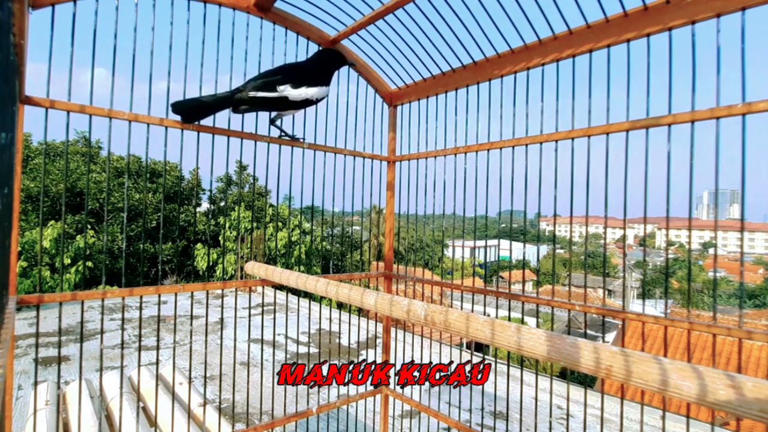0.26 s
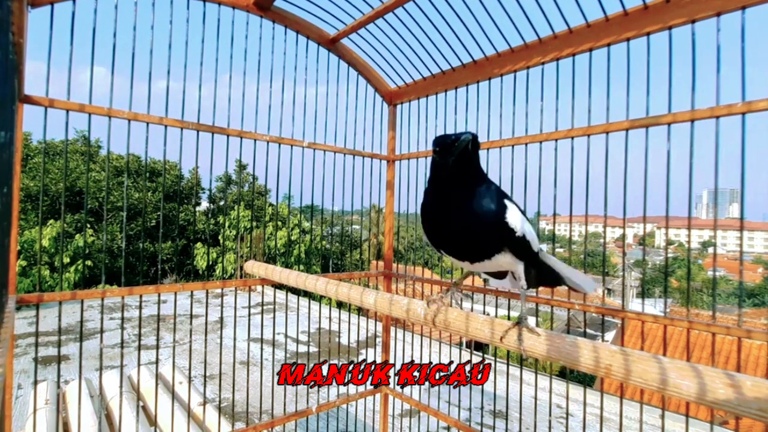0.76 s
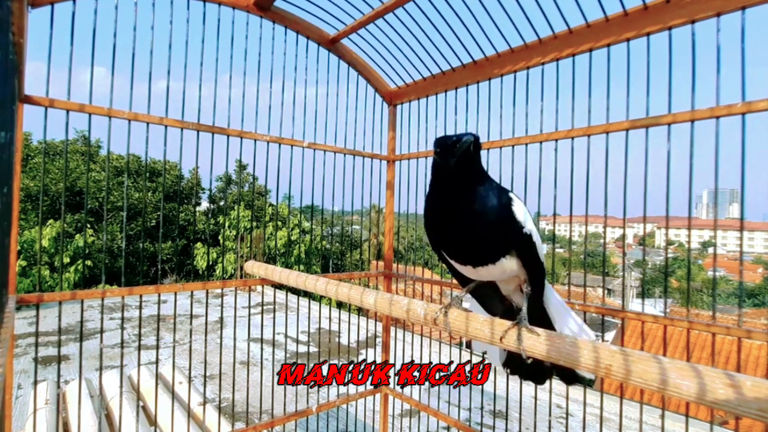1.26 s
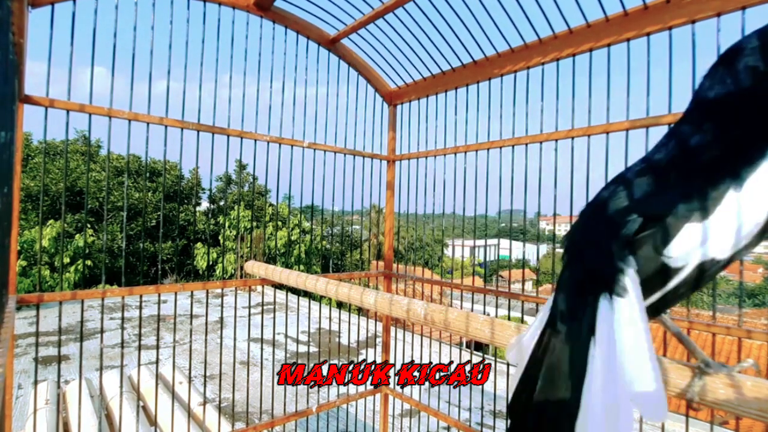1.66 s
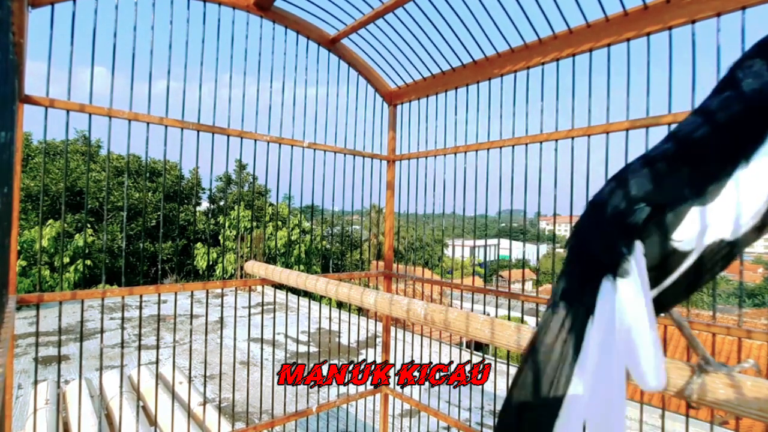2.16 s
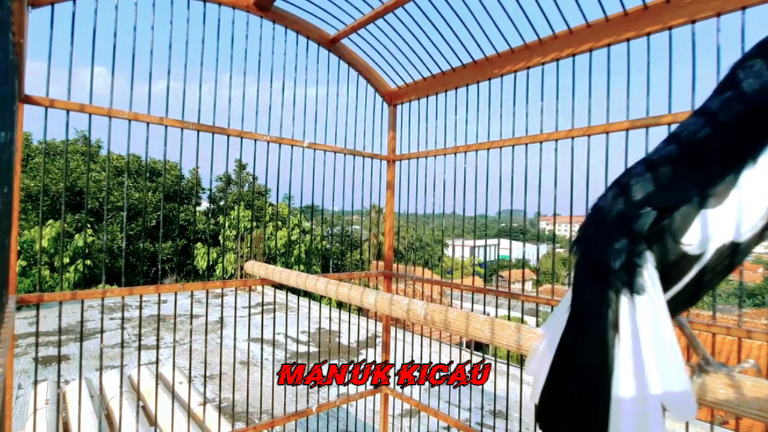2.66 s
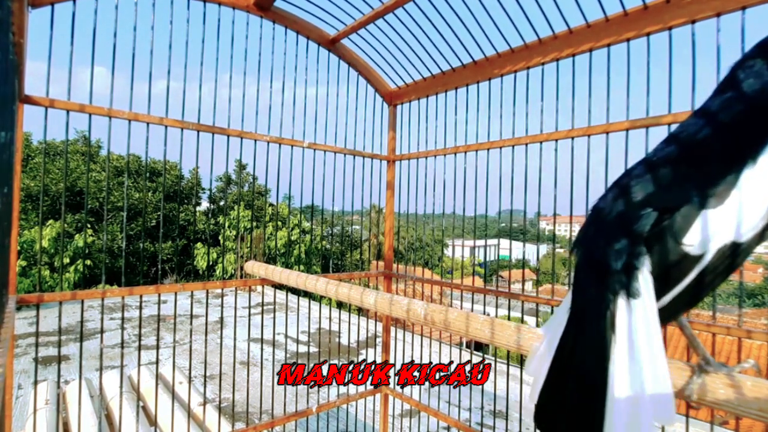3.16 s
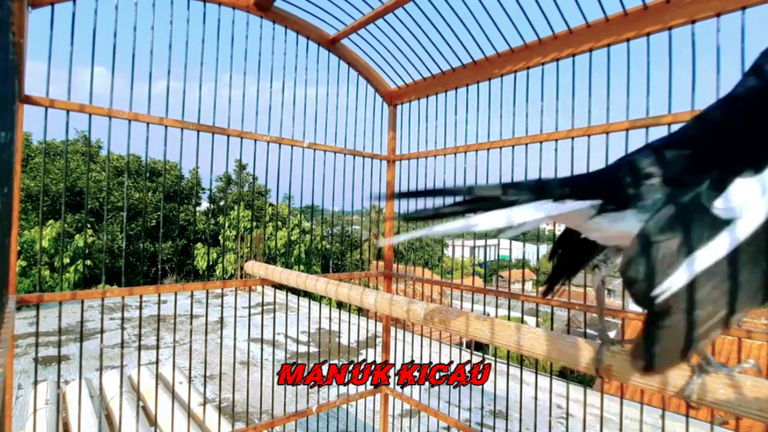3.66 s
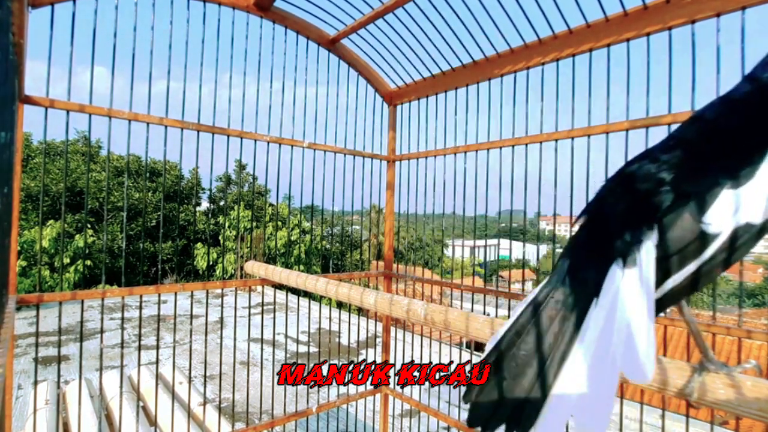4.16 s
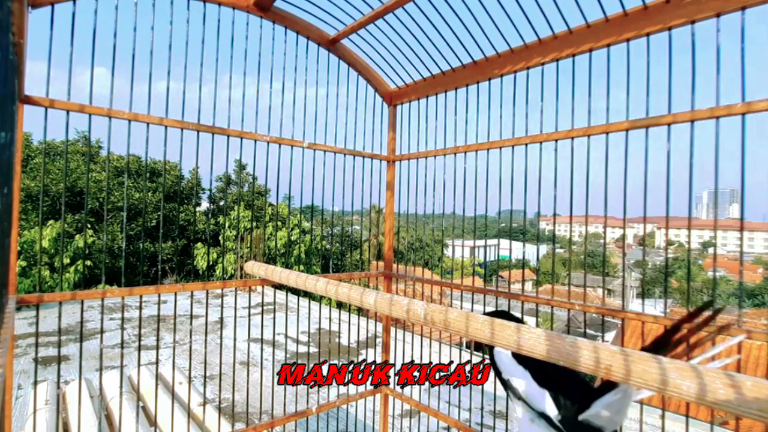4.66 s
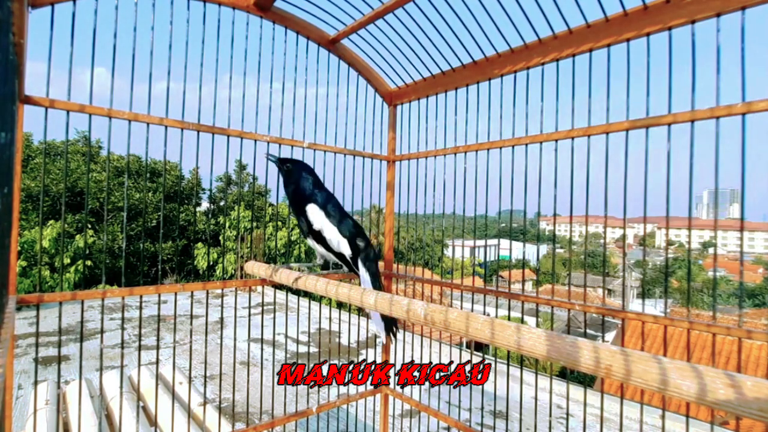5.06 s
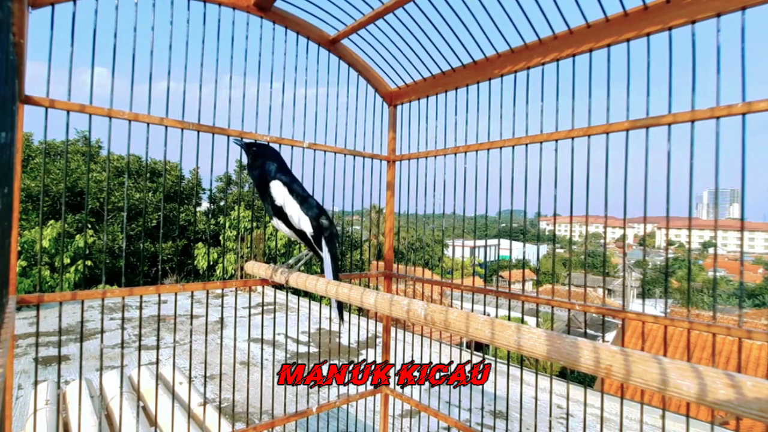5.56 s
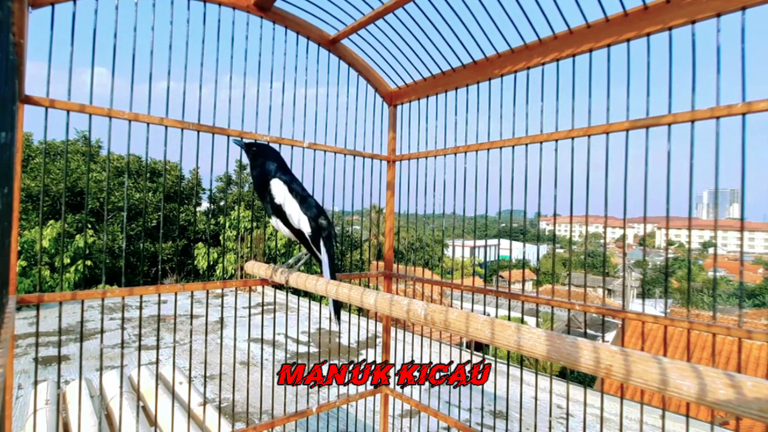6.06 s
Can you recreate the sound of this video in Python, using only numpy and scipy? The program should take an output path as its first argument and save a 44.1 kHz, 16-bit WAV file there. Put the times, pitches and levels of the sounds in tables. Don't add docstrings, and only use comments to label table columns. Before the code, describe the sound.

A songbird in a wooden cage sings very near the microphone, loud enough to distort. After two hard ticks and a jangling wire, it calls harshly while the wires buzz and settle. Separate churrs, chews and thin high notes alternate with short gaps; feet thud dully on wood. Another, more echoing bird glides and squeaks in reply. Wind buffets low, mostly on the right around three seconds, and distant town air hums throughout outdoors.

```python
import sys
import numpy as np
from scipy import signal
from scipy.io import wavfile
from scipy.ndimage import uniform_filter1d

SR = 44100
rng = np.random.default_rng(int(sys.argv[2]) if len(sys.argv) > 2 else 0)


def transcribe(u):
    v = np.clip(np.atleast_2d(u).T, -1, 1)
    q = np.round(v * 32767).astype(np.int16)
    wavfile.write(sys.argv[1], SR, q)


def boost(x):
    u = np.asarray(x, float) / 20
    return 10 ** u


N = 278271
LEAD_S = .002


def read(points, hz):
    f, value = np.transpose(points)
    return np.interp(np.log(hz + 1), np.log(f + 1), value)


def evened(x):
    return x / np.sqrt(np.mean(x ** 2, -1, keepdims=True) + 1e-20)


def add(mix, start_s, sound, pan_db):
    part = mix[:, round(start_s * SR):][:, :sound.shape[-1]]
    ports = sound * boost(np.array([[pan_db], [-pan_db]]) / 2)
    part += ports[:, :part.shape[1]] / np.sqrt(np.cosh(pan_db * np.log(10) / 20))


def wobble(shape, hz):
    low_pass = signal.butter(4, hz, fs=SR, output="sos")
    return evened(signal.sosfilt(low_pass, rng.standard_normal(shape)))


def noise(spectrum, patchy_db):
    hz = np.fft.rfftfreq(2048, 1 / SR)
    a, b, patches = rng.standard_normal((N // 512 + 5, 1025, 2, 3)).T
    patches = uniform_filter1d(patches, size=12, axis=1)
    patches = evened(uniform_filter1d(patches, size=5, axis=2))
    z = (a + 1j * b) * boost(read(spectrum, hz)[:, None] + patchy_db * patches)
    return evened(signal.istft(z, nperseg=2048, noverlap=1536)[1][:, :N])


def held(table, s):
    return [row for row in table if row[0] <= s][-1][1:]


def sung(voices, rows):
    if rows is None:
        return [np.array(voice) for voice in voices]
    return [np.array(voice) * [1, ratio, 1] + [beat, 0, db]
            for beat, ratio, *strengths in rows for voice, db in zip(voices, strengths)]


def town_hum():
    # pitch_hz, level_db (per Hz)
    hum = [(150, -11), (330, -5), (500, -20.5), (1000, -28), (3000, -34.5), (6000, -41.5), (8300, -50),
           (9500, -75.5)]
    return boost(-47.5) * noise(hum, 0.67)


def wind():
    # time_s, left_db, right_db
    gusts = [(0, -37.5, -45), (1.8, -43.5, -40), (1.95, -41.5, -30), (2.2, -46, -38.5), (2.5, -57, -23.5),
             (2.8, -45, -29), (2.951, -40, -18), (3.45, -53, -24), (3.52, -45, -35.5), (4.1, -45, -38.5),
             (5.4, -40, -40.5), (6.31, -39.5, -35.5)]
    # pitch_hz, level_db
    rumble = [(25, -38.5), (60, -12), (100, 6), (140, -8.5), (250, -22.5), (500, -69), (3000, -110)]
    s, *ports_db = np.transpose(gusts)
    t = np.arange(N) / SR
    level_db = np.array([np.interp(t, s, port) for port in ports_db])
    return noise(rumble, 1.8) * boost(level_db + 1.8 * wobble((2, N), 40))


def balcony(x, early_db, tail_db, tail_t60):
    t = np.arange(SR // 2) / SR
    signs = rng.choice([-1., 1.], (2, len(t)))
    taps = signs * (rng.random((2, len(t))) < .05) * (t > .002)
    early = taps * boost(-60 * t / .05)
    tail = taps * boost(-60 * t / tail_t60)
    echo = boost(early_db) * early / np.linalg.norm(early[0])
    echo = echo + boost(tail_db) * tail / np.linalg.norm(tail[0])
    return signal.fftconvolve(x, echo, axes=1)[:, :N]


def wood_knocks():
    # start_s, peak_db, pitch_hz, t60_s,
    # left_minus_right_db
    knocks = [(0.179, -32, 1340, 0.085, 33), (.183, -35, 449, 0.17, 27), (0.673, -23, 1218, .11, 32),
              (0.673, -21.5, 345.3, 0.18, 40), (0.676, -28, 582, 0.093, 31), (.833, -19, 98.8, 0.21, 32.5),
              (.835, -25.5, 550, 0.2, 36), (0.839, -40, 1190, 0.094, 19), (1.549, -38, 332.2, 0.39, 9),
              (2.253, -8, 107.2, 0.084, -33), (4.399, -38.5, 313, 0.39, 19), (4.703, -32.5, 321, 0.23, 24),
              (4.825, -21.5, 534.7, 0.15, 28), (4.829, -21.5, 123.4, .12, 19.5),
              (4.985, -38, 518.7, 0.16, 29)]
    out, t = np.zeros((2, N)), np.arange(SR // 2) / SR
    for s, db, hz, t60, pan_db in knocks:
        wide = 1.127 + 50 / hz
        band = signal.butter(2, [hz / wide, hz * wide], "bandpass", fs=SR, output="sos")
        thud = evened(signal.sosfilt(band, rng.standard_normal(len(t))))
        thud = thud + 0.31 * wobble(len(t), 1800)
        thud += 1.8 * np.sin(2 * np.pi * hz * t)
        attack = 1 - np.exp(-t / 0.0083)
        add(out, s, boost(db + 2.5 - 60 * t / t60) * thud * attack, pan_db)
    return out


def ringing_wire():
    # pitch_hz, level_db, t60_s
    modes = [
        (2350, -36, 0.23),
        (3550, -45, 0.55),
        (7070, -58, .5),
    ]
    out, t = np.zeros((2, N)), np.arange(SR // 2) / SR
    for hz, db, t60 in modes:
        ring = boost(db - 60 * t / t60) * np.sin(2 * np.pi * hz * t)
        rattle = 1 + 1.15 * wobble(len(t), 68)
        attack = 1 - np.exp(-t * 2400000.0 / hz)
        add(out, .168, ring * rattle * attack, 6)
    return out


def clicks():
    # start_s, peak_db
    ticks = [
        (0.1254, -5),
        (0.132, -2),
        (0.1646, -50),
        (1.945, -53),
        (1.955, -56),
        (3.441, -59.5),
        (4.838, -45.5),
    ]
    out = np.zeros((2, N))
    for s, db in ticks:
        add(out, s, boost(db) * np.array([1., -1, .3]), 8)
    return out


def wire_buzz():
    # pitch_hz, width_hz, level_db
    resonances = [
        (3550, 330, -2),
        (4150, 350, -7),
        (5500, 520, -5),
        (4900, 2600, -12),
        (6600, 670, -14),
        (9490, 5100, -25),
        (12200, 5700, -16.5),
    ]
    hz = np.geomspace(1500, 16000, num=400)
    power = sum(boost(db) ** 2 / (1 + (2 * (hz - f) / width) ** 2) for f, width, db in resonances)
    wires_db = 10 * np.log10(power) - 24 * (hz < 3000) * np.log2(3000 / hz)

    landing_s, rise_s, hold_s, still_s = .56, 0.12, .2, .94
    t = np.arange(N) / SR - landing_s
    rise_db = -40 * np.maximum(1 - t / rise_s, 0)
    sag_db = 24 * np.maximum(t - rise_s - hold_s, 0)
    stop_db = 69 * np.maximum(t - still_s, 0)
    shake_db = np.maximum(-24.5 + rise_db - sag_db - stop_db, -200)
    shake = boost(shake_db + 1.2 * wobble(N, 110))

    buzz = noise(np.c_[hz, wires_db], 2.5)
    dull = signal.sosfiltfilt(signal.butter(3, 7000, fs=SR, output="sos"), buzz)
    buzz = dull + (buzz - dull) * boost(-24 * np.maximum(t, 0))
    return buzz * shake * boost(np.array([[3.], [-3.5]]))


def cage():
    return wood_knocks() + ringing_wire() + clicks() + wire_buzz()


def whistle(rows, lag_ms, rough, second_db, beak_db=26, third_db=-70):
    # multiple, level_db
    overtones = [(3, -62), (4, -60), (5, -62), (6, -54)]
    s, hz, level_db = np.transpose(rows)
    t = np.arange(s[0] - LEAD_S, s[-1] + LEAD_S, 1 / SR)
    pitch = uniform_filter1d(np.interp(t, s, hz), size=60)
    pitch = pitch + 1200 * rough ** 2 * wobble(len(t), 200)
    turns = np.cumsum(pitch) / SR
    turns = np.array([np.interp(t - lag_ms / 1000, t, turns), turns])

    tone = np.sin(2 * np.pi * turns)
    tone += boost(second_db) * np.sin(4 * np.pi * turns)
    tone += boost(third_db) * np.sin(3 * 2 * np.pi * turns)
    for multiple, db in overtones:
        beak = beak_db * np.exp(-((multiple * pitch - 14500) / 2300) ** 2)
        strength = boost(db - 50 * rough + beak) * (multiple * pitch < 16e3)
        tone += strength * np.sin(2 * np.pi * round(multiple) * turns)
    tone += boost(-15.5) * rough * wobble((2, len(t)), 9500)

    flutter = 1 + rough * wobble(len(t), 450)
    swell = np.interp(t, s, boost(level_db / 2)) ** 2
    fade = signal.windows.tukey(len(t), min(.008 * SR / len(t), 1))
    return tone * flutter * swell * fade


def neighbour_whistles():
    # time_s (from the beat), pitch_hz, level_db
    glide = [
        [(-.09, 2174, -46), (-.034, 2646, -16), (0, 3038, -26.5)],
        [(0, 3250, -24), (.04, 3550, -16), (.075, 3618, -20)],
        [(.095, 2980, -27.5), (.15, 2267, -29.5), (.21, 2350, -26), (.255, 2546, -39)],
    ]
    # beat_s, pitch_ratio, strength_db of each part
    glide_beats = [
        (3.87, .99, -.1, 4.5, -1.5),
        (4.475, 1.01, 0.12, -1.5, -6),
    ]
    # time_s, pitch_hz, level_db
    strays = [
        [(2.05, 2510, -56), (2.175, 4530, -47.5)],
        [(3.36, 4406, -55.5), (3.466, 4080, -26), (3.508, 4004, -44), (3.6, 3940, -50.5)],
        [(3.69, 4637, -53), (3.72, 4590, -54), (3.86, 4425, -62.5)],
        [(3.5, 3054, -67), (3.56, 3180, -45.5), (3.66, 3246, -54.5)],
        [(3.64, 3500, -56.5), (3.68, 3656, -52.5), (3.76, 3734, -62)],
    ]
    out = np.zeros((2, N))
    for rows in sung(glide, glide_beats) + strays:
        s, hz = rows[0][0], rows[0][1]
        rough = .05 if s > 3 else .5
        third_db = -38 if hz > 4e3 else -70
        add(out, s - LEAD_S, whistle(rows, -.26, rough, -41.0, 0, third_db), 9)
    return out


def neighbour_squeaks():
    # start_s, end_s, pulse_rate_hz, strongest_multiple, level_db
    squeaks = [
        (2.862, 3.022, 654, 4, -45.5),
        (3.471, 3.592, 598.5, 5, -38),
    ]
    out = np.zeros((2, N))
    for start, end, hz, top, db in squeaks:
        top = round(top)
        t = np.arange(0, end - start, 1 / SR)
        bend = 1 - 0.0412 * np.exp(-t / 0.021) - 0.016 * (t / t[-1]) ** 8
        turns = np.cumsum(hz * bend * (1 + 0.005 * wobble(len(t), 60))) / SR
        upper = np.zeros(len(t))
        for k in range(1, 16):
            level_db = -17.0 + 9.0 * (k % top == 0) - 1.6 * k + 3.0 * rng.standard_normal()
            upper += boost(level_db) * np.sin(2 * np.pi * (top + k) * turns)
        stack = np.sin(2 * np.pi * top * turns) + upper * t / t[-1]
        swell = signal.windows.tukey(len(t), .4) * (1 + 0.28 * wobble(len(t), 117.8))
        add(out, start, boost(db) * stack * swell, 10)
    return out


def repeated_syllables():
    # beat_s, pitch_ratio, strength_db of each curve
    churr = [
        [(-.05, 2434, -28), (-.045, 2704, -17.5), (-.03, 2552, 3.5), (-.017, 2103, 2), (-.01, 2314, 5.5),
         (0, 2386, 4)],
        [(0, 2571, 2), (.035, 2596, -9.5), (.055, 2540, -31)],
        [(.001, 1691, -6), (.005, 1954, 2.5), (.022, 1852, 2), (.043, 1497, -27)],
    ]
    churr_beats = [
        (2.223, 1.023, -0.17, 2.2, 0.16),
        (3.965, 0.99, 1, 0.02, 1),
    ]
    chew = [
        [(2.325, 2852, -28), (2.337, 2800, -9), (2.347, 2714, -2.5), (2.355, 2416, -5.5), (2.359, 2410, -6.5),
         (2.365, 2640, -12)],
        [(2.365, 2747, -5), (2.385, 2790, -2.5), (2.389, 2730, -2.5), (2.397, 2351, -11), (2.403, 2285, -10.5),
         (2.428, 2483, -37.5)],
        [(2.485, 2903, -27.5), (2.495, 2890, -14.5), (2.503, 2792, -7), (2.515, 2480, -5), (2.527, 2478, -10.5)],
        [(2.527, 2687, -13), (2.535, 2835, -0.5), (2.545, 2852, 0), (2.557, 2573, -15.5), (2.561, 2547, -8.5),
         (2.573, 2526, -20.5), (2.59, 2528, -45.5)],
    ]
    chew_beats = [
        (0.00072, 0.99, 7.6, 8.6, 11, 8.2),
    ]
    chatter = [
        [(1.612, 2350, -32.5), (1.616, 2600, -18.5), (1.622, 2800, -17.5), (1.629, 2450, -18),
         (1.634, 2400, -5.5), (1.641, 2250, -2), (1.646, 2550, -2.5), (1.654, 2300, -6.5), (1.662, 2350, -5)],
        [(1.662, 2324, -10.5), (1.668, 2282, -16), (1.676, 2469, -13.5), (1.698, 2431, -22.5),
         (1.71, 2517, -41.5), (1.72, 2404, -43)],
        [(1.66, 2178, -15.5), (1.67, 2173, -4.5), (1.68, 1900, -17.5), (1.682, 1922, -14), (1.694, 1483, -17),
         (1.706, 1490, -38)],
    ]
    chatter_beats = [
        (0.00032, 0.96, 7, 6, 8.9),
    ]
    slide = [
        [(-.055, 2587, -27), (-.035, 2556, -15), (-.022, 2413, -3), (-.012, 2057, 1.5), (0, 2420, -4.5)],
        [(0, 1758, -11), (.008, 1831, 3), (.034, 1720, -3), (.048, 1453, -32.5)],
        [(0, 2393, -4), (.05, 2580, -26)],
    ]
    slide_beats = [
        (4.529, 1.01, 3, -1.2, 0.5),
        (4.936, .99, -2, -0.054, -4),
    ]
    alarm = [
        [(.561, 5150, -33.5), (.572, 5300, -22), (.578, 5150, -6), (.583, 4600, -3), (.588, 3750, -0.5),
         (.593, 3950, 1), (.597, 4450, -6.5), (.601, 3850, 1), (.604, 3700, -12)],
        [(.604, 3750, -10), (.61, 4000, -2), (.613, 4300, -9.5), (.616, 4650, 1), (.619, 4350, -9.5),
         (.623, 4050, -3), (.629, 4050, -22)],
        [(.63, 4350, -24.5), (.634, 4470, -5), (.638, 4430, -26), (.641, 4650, -15), (.646, 4550, -11),
         (.652, 4450, -14), (.655, 4350, -26.5)],
    ]
    alarm_partials = [
        (0, 1, 1.5, 1.5, 0),
        (0, 1.5, -9, -15.5, -22),
        (0, 2, -22, -24, -26),
    ]
    rasp = [
        [(-.004, 4190, -20), (.004, 4275, -14.5), (.02, 4400, -21), (.032, 4300, -34), (.065, 4270, -46)],
        [(0, 3700, -23.5), (.006, 3750, -16), (.025, 3650, -30), (.045, 3566, -50)],
    ]
    rasp_beats = [
        (5.245, 1.04, 3.5, 4.5),
        (5.346, .995, 0.5, 2.5),
        (5.456, .98, 0, -9),
        (5.562, 1.04, -12.5, -5),
    ]
    tseep = [
        [(-.019, 4287, -42.5), (-.008, 4410, -12), (-.002, 4000, -23.5)],
        [(-.005, 3727, -26.5), (.001, 3500, 8), (.008, 3064, 1), (.014, 3500, 1.5)],
        [(.013, 3611, 2), (.022, 3500, 7.5), (.044, 3430, 2.5), (.054, 3380, -17), (.075, 3290, -44.5)],
    ]
    tseep_beats = [
        (1.774, 1, 4.5, -.1, -1),
        (4.094, 0.98, -2.2, 1.5, -1.5),
        (4.656, .99, -15.5, 1.8, -5),
    ]
    under = [
        [(-.042, 1449, -25), (-.018, 1349, -21), (.002, 1650, -7.5)],
    ]
    under_beats = [
        (4.53, .98, 6),
        (4.938, .92, -6),
        (5.093, 1.05, -2),
        (1.667, 0.71, -3.5),
        (2.535, 1.08, -2),
        (2.22, 1.1, -10),
    ]
    return [(churr, churr_beats, (.18, .34, .28), -46), (chew, chew_beats, (.12, .3, .14, .2), -42.5),
            (chatter, chatter_beats, (.28, .35, .3), -46), (slide, slide_beats, (.22, .14, .32), -45),
            (alarm, alarm_partials, (.22, .14, .06), -42), (rasp, rasp_beats, .17, -52),
            (tseep, tseep_beats, (.15, .08, .04), -40.5), (under, under_beats, .25, -44.5)]


def single_syllables():
    # time_s, pitch_hz, level_db
    tsit = [
        [(.088, 4570, -35), (.093, 4630, -20), (.115, 3860, -20), (.119, 4150, -38)],
        [(.12, 4700, -33.5), (.129, 4640, -11), (.138, 4400, -32)],
    ]
    alarm_low = [
        [(0.54, 2601, -68), (0.572, 2607, -13), (0.578, 2590, -18.5), (0.586, 2170, -10), (0.592, 2170, -18),
         (0.6, 2220, -24)],
        [(0.6, 2060, -8), (0.608, 1907, -20), (0.614, 1890, -31), (0.624, 2005, -17), (0.63, 2280, -24),
         (0.65, 2260, -20), (0.654, 2440, -30)],
    ]
    twirl = [
        [(.653, 2750, -31), (.656, 2820, -7), (.664, 2780, -11), (.669, 3300, -6), (.675, 2800, -13),
         (.681, 3230, -9), (.688, 3330, -9.5), (.694, 3050, -19), (.706, 3500, -30)],
    ]
    arch = [
        [(1.122, 1400, -32), (1.137, 1650, -2), (1.151, 1934, -7.5), (1.168, 2066, -12.5), (1.226, 1795, -6),
         (1.256, 1570, -14), (1.28, 1720, -60)],
        [(1.14, 1109, -27), (1.155, 965, -16), (1.197, 1078, -18.5), (1.245, 1110, -48)],
    ]
    chew_low = [
        [(2.39, 2470, 3.5), (2.396, 2405, -0.5), (2.42, 2225, -24.5)],
    ]
    turn = [
        [(5.045, 2397, -27), (5.06, 2817, -8.5), (5.084, 2241, 1), (5.092, 2500, -9)],
        [(5.092, 2350, 0), (5.109, 2897, -12.5), (5.127, 2796, -2.5), (5.141, 2747, -16.5), (5.158, 2930, -37)],
    ]
    peep = [
        [(5.21, 2943, -30.5), (5.22, 3128, -2), (5.233, 2922, 2), (5.24, 2770, -16), (5.25, 3054, -33)],
    ]
    chip = [
        [(5.316, 2850, -36), (5.322, 3150, -22), (5.333, 3250, -22), (5.341, 2950, -5.5), (5.347, 2850, -18),
         (5.351, 3250, -16.5), (5.358, 3100, -24.5), (5.375, 3100, -36)],
        [(5.418, 2800, -32.5), (5.424, 3050, -6.5), (5.431, 3250, -21), (5.44, 3100, -13), (5.445, 2800, -11),
         (5.448, 2800, -27.5), (5.453, 2950, -16.5), (5.458, 2950, -30.5)],
        [(5.526, 2850, -29), (5.531, 2950, -16), (5.537, 3150, -30.5), (5.544, 3100, -10.5), (5.55, 2950, -12),
         (5.559, 2850, -11.5), (5.57, 2900, -21), (5.585, 2850, -40.5)],
    ]
    grace = [
        [(5.635, 2275, -33.5), (5.652, 2483, -18.5), (5.682, 2412, -27), (5.692, 2445, -50)],
    ]
    long = [
        [(5.695, 2498, -37.5), (5.738, 2544, -13.5), (5.806, 2638, -5), (5.827, 2594, -1), (5.835, 2436, -13)],
        [(5.9, 1820, -32), (5.934, 2070, -4), (5.96, 2098, -19.5), (5.966, 1667, -5.5), (5.98, 1313, -51.5)],
        [(6.264, 1398, -29), (6.274, 1775, -13.5), (6.281, 1900, -39)],
        [(6.279, 2050, -31), (6.288, 2228, -2.5), (6.309, 2350, 1.5)],
    ]
    drop = [
        [(5.835, 2540, -16.5), (5.844, 2320, 1.5), (5.857, 2044, -1.4), (5.864, 1618, -19.5),
         (5.878, 2130, -30)],
        [(6.045, 3333, -27), (6.062, 3390, -15.5), (6.075, 2931, -8.5), (6.089, 1950, -18), (6.11, 2910, -35)],
    ]
    return [(tsit, None, .2, -30), (alarm_low, None, .2, -50), (twirl, None, .08, -20),
            (arch, None, .04, -42.5), (chew_low, None, .25, -42), (turn, None, (.2, .14), -43),
            (peep, None, .047, -52), (chip, None, (.08, .1, .3), -24), (grace, None, .14, -25.5),
            (long, None, .0069, -49), (drop, None, .098, -51)]


def singer():
    # time_s, left_minus_right_db
    facing = [(0, 0.7), (.55, 1.5), (.65, 0), (1.1, 2), (1.6, -4), (4.07, -10), (4.47, 5.5), (4.62, -6),
              (4.87, 4), (5.2, 6.5), (5.63, 3.5)]
    # time_s, lag_ms
    hops = [
        (0, -.07),
        (.5, -.02),
        (1.1, .07),
        (1.6, .35),
        (4.47, .19),
        (4.62, .45),
        (4.87, .07),
        (5.04, -.01),
        (5.2, -.12),
    ]
    out = np.zeros((2, N))
    for voices, beats, roughs, second_db in repeated_syllables() + single_syllables():
        notes = sung(voices, beats)
        for note, rough in zip(notes, np.resize(roughs, len(notes))):
            s = note[0, 0]
            add(out, s - LEAD_S, whistle(note, *held(hops, s), rough, second_db), *held(facing, s))
    return out


def scene():
    song = singer()
    others = neighbour_whistles() + neighbour_squeaks()
    echoes = balcony(song, -12, -33.5, 0.23) + balcony(others, -5, -14, .5)
    return town_hum() + wind() + cage() + others + song + echoes


def roll_off(x):
    return signal.sosfilt(signal.butter(12, 15420, fs=SR, output="sos"), x)


def record(dry):
    # start_s, end_s
    dropout = (.137, .166)
    t = np.arange(N) / SR
    gain = np.where((t > dropout[0]) & (t < dropout[1]), .08, 1.)
    heard = dry * uniform_filter1d(gain, size=40)
    return roll_off(np.clip(heard, -1, 1))


dry = scene()
out = record(dry)
transcribe(out)
```